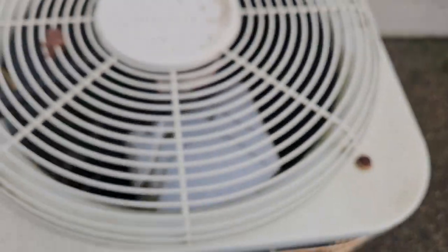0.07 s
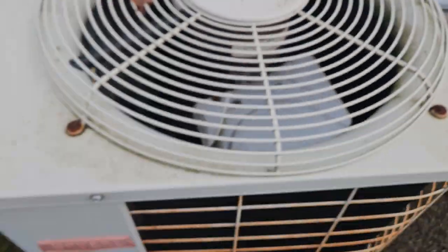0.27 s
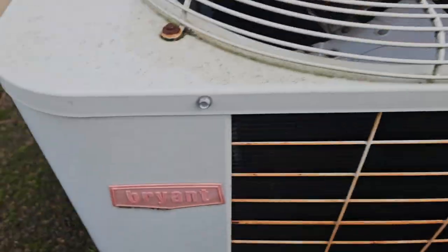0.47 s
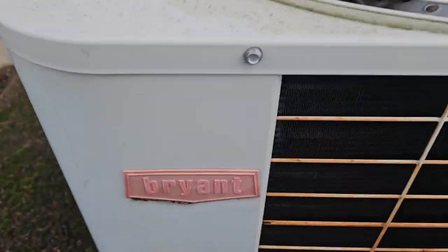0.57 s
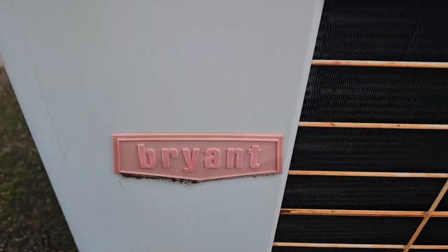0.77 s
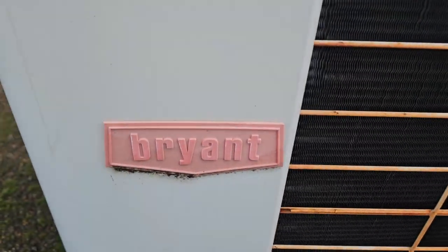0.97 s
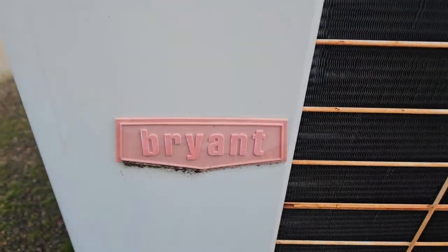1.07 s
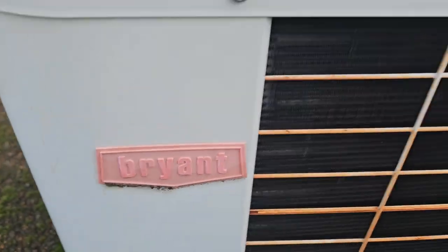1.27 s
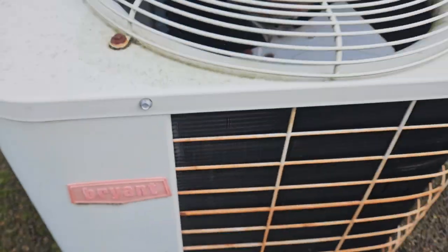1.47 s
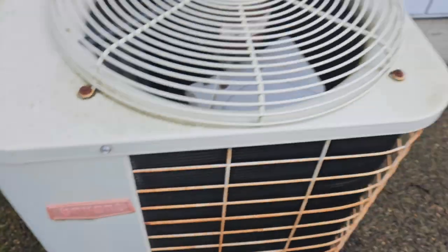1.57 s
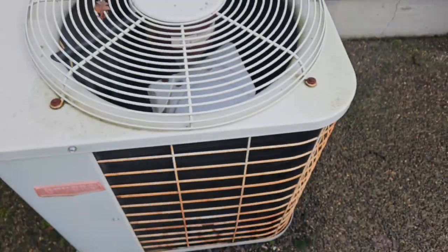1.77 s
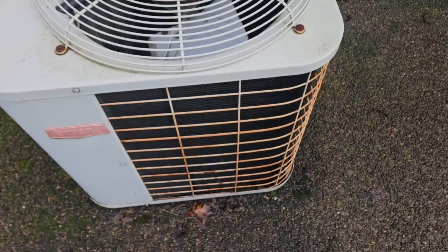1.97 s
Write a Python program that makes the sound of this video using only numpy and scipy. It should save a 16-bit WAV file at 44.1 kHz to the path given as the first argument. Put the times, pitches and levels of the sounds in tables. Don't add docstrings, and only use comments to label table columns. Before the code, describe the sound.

Gritty footsteps scuff and drag on stony ground beside a low rumbling outdoor air-conditioning unit

```python
import sys
import numpy as np
from scipy import signal
from scipy.fft import rfft, irfft, next_fast_len
from scipy.io import wavfile
from scipy.ndimage import uniform_filter1d

SR = 44100
rng = np.random.default_rng(int(sys.argv[2]) if len(sys.argv) > 2 else 0)


def output_pcm(signal):
    pcm = np.clip(np.atleast_2d(signal).T, -1, 1) * 32767
    wavfile.write(sys.argv[1], SR, np.round(pcm).astype(np.int16))


def amplitude_ratio(level_db):
    exponent = np.asarray(level_db, float) / 20
    return 10 ** exponent


N = 88464


def curve(table, col=1):
    return np.interp(np.arange(N) / SR, np.array(table)[:, 0], np.array(table)[:, col])


def on_log(table, hz):
    return np.interp(np.log(hz + 1), np.log(np.array(table)[:, 0]), np.array(table)[:, 1])


def unit(x):
    return x / np.sqrt(np.mean(x ** 2))


def colour(x, table):
    size = next_fast_len(N + SR // 4)
    gain = amplitude_ratio(on_log(table, np.fft.rfftfreq(size, 1 / SR)))
    return irfft(rfft(x, size) * gain, size)[..., :N]


def band(x, hz, width_hz):
    return signal.lfilter(*signal.iirpeak(hz, hz / width_hz, SR), x)


def walk(rate):
    k = int(SR / rate)
    steps = np.repeat(rng.standard_normal(N // k + 1), k)
    return 1.68 * uniform_filter1d(uniform_filter1d(steps, k), k)[:N]


def pan(db):
    return amplitude_ratio(np.array([db / 2, -db / 2]) - np.abs(db) / 4).reshape(2, -1)


def add(out, start_s, x, pan_db):
    right_lag_s = pan_db * 30e-6
    for port, gain, lag_s in zip(out, pan(pan_db), (0, right_lag_s)):
        i = max(int((start_s + lag_s) * SR), 0)
        port[i:i + len(x)] += gain * x[:N - i]


def crackle(apart=1):
    grains_per_s, spread_db, grain_share_db, left_lag_s = 1500, 2.5, -7, .0003
    hits = rng.random(N) < grains_per_s / SR
    grains = hits * amplitude_ratio(spread_db * np.minimum(rng.exponential(size=N), 4))
    size = 1 + amplitude_ratio(grain_share_db) * unit(grains)
    shared, left, right = size * rng.standard_normal((3, N))
    late = np.roll(shared, int(left_lag_s * SR))
    return unit(np.array([late + apart * left, shared + apart * right]))


def rub(bands, level_db, pan_db, patchy_db, rate, apart=1):
    push = crackle(apart) * amplitude_ratio(patchy_db * walk(rate))
    ringing = sum(amplitude_ratio(db) * band(band(push, hz, w), hz, w) for hz, w, db in bands)
    return unit(ringing) * amplitude_ratio(curve(level_db)) * pan(pan_db)


def snap(db, t60_s, hz, width_hz):
    attack_s = 0.00077
    t = np.arange(SR // 20) / SR
    burst = rng.standard_normal(len(t)) * np.minimum(t / attack_s, 1) * amplitude_ratio(db - 60 * t / t60_s)
    return band(band(burst, hz, width_hz), hz, width_hz)


def unit_air():
    # frequency in Hz, level in dB per Hz.
    rumble_colour = [(12, -64.5), (20, 2), (114, 0.5), (205, -10.5), (245, -5), (300, -13), (324, -11.5),
                     (5980, -54), (9000, -70), (11700, -102), (19800, -120)]
    # time in seconds, level in dB.
    rumble_db = [(0.0, -47), (1.32, -48.5), (2.0, -47.5)]
    # frequency in Hz, likeness from 0 to 1.
    likeness = [(30, 0.92), (300, 0.89), (1000, 0.34), (4000, 0)]
    # time in seconds, level in dB.
    hum_db = [(0, -75), (.8, -80.5), (1.1, -71.5), (1.22, -57), (1.6, -55), (1.75, -65.5), (2, -73)]
    hum_hz, hum_width_hz = 245, 34

    out = 0
    for hz in 22 * 2 ** np.arange(0, 9.1, .5):
        mid, side = (band(rng.standard_normal(N), hz, hz / 1.42) for _ in range(2))
        like = np.clip(on_log(likeness, hz), 0, 1)
        both = np.sqrt(1 + like) * mid + np.sqrt(1 - like) * side * np.array([[1], [-1]])
        out = out + amplitude_ratio(3.07 * walk(6.7)) * both
    rumble = unit(colour(out, rumble_colour)) * amplitude_ratio(curve(rumble_db))
    hum = unit(band(band(rng.standard_normal(N), hum_hz, hum_width_hz), hum_hz, hum_width_hz))
    return rumble + hum * amplitude_ratio(curve(hum_db)) * pan(-3.5)


def rustle():
    # time in seconds, level in dB, left minus right in dB.
    effort = [(0, -63.5, -6), (.1, -79.5, -22), (.23, -73.5, -2), (.3, -62, 7), (.42, -69.5, 1),
              (.55, -73.5, -5), (.68, -69, -8.5), (.8, -68, -11.5), (.92, -80, -8), (.97, -90.5, -8.5),
              (1.29, -87.5, -9.5), (1.37, -76.5, -3), (1.5, -79.5, -11), (1.62, -82, -11),
              (1.7, -78.5, -14), (1.82, -78.5, -7.5), (2, -81.5, -14.5)]
    # frequency in Hz, level in dB per Hz.
    rustle_colour = [(300, -12), (1000, 17.5), (2500, 1), (3900, -5), (5500, 5.5), (7000, -1), (8800, -0.5),
                     (16000, -5.5)]
    flutter_db = 1.93 * walk(23.53)
    level = amplitude_ratio(curve(effort) + flutter_db + 5.0)
    return unit(colour(crackle(), rustle_colour)) * level * pan(curve(effort, col=2))


def scuffs():
    # frequency in Hz, level in dB per Hz.
    grit_colour = [(300, -12), (1500, 4.5), (3000, 4), (4000, 0.5), (5300, 4.5), (6600, -2), (8500, 3),
                   (16000, -1)]
    # start in seconds, length in seconds, level in dB, left minus right in dB,
    # brightness in dB per octave.
    scuff_rows = [(0, 0.049, -65, -14, 3), (0.242, 0.036, -57.5, 5, 7.5), (0.278, 0.035, -45.5, 2, 2.5),
                  (0.314, 0.05, -52.5, -3, -1.5), (0.38, 0.035, -63.5, -4, -3), (0.417, 0.11, -62, -12, -3),
                  (0.562, 0.024, -78, -8, -2), (0.696, 0.043, -54.5, 0.5, -3.5),
                  (0.748, 0.022, -57.5, -8, 0.5), (.785, 0.033, -71, -3, 2), (0.829, 0.088, -68, -12, -7),
                  (1.136, 0.05, -79, -17, -11.5), (1.305, 0.013, -65, -22, -4),
                  (1.316, 0.035, -57, -15, -2.5), (1.39, .03, -77.5, -12, 4),
                  (1.439, 0.053, -72.5, -20, -2.5), (1.524, 0.05, -66.5, -22, -2),
                  (1.72, 0.075, -71.5, -19.5, -5.5), (1.845, 0.061, -74, -22, -5.5)]
    attack_s, release_s, sag_db, banding_db = .003, .005, -2, 2.5
    swell_share, fade_share = .12, .25

    out, t = 0, np.arange(N) / SR
    grit = unit(colour(crackle(), grit_colour)) * amplitude_ratio(1.7 * walk(120) + 1.4 * walk(40.04))
    hz = np.geomspace(500, 16000, num=24)
    for start, length, db, pan_db, tilt_db in scuff_rows:
        age = np.clip(t - start, 0, None)
        rise = np.clip(age / (attack_s + swell_share * length), 0, 1)
        fade = np.exp(-np.clip(age - length, 0, None) / (release_s + fade_share * length))
        shape = rise * amplitude_ratio(sag_db * age / length) * fade
        banded = tilt_db * np.log2(hz / 4000) + banding_db * rng.standard_normal(len(hz))
        out = out + colour(grit, np.array([hz, banded]).T) * shape * amplitude_ratio(db) * pan(pan_db)
    return out


def drag():
    # frequency in Hz, width in Hz, level in dB.
    drag_bands = [(3190, 420, 4.5), (4600, 470, -5), (2290, 480, 0), (1520, 600, -2)]
    # time in seconds, level in dB.
    drag_db = [(0, -62.5), (.05, -61), (.16, -58), (.275, -57), (.3, -72.5), (.4, -140)]
    return rub(drag_bands, drag_db, pan_db=-10, patchy_db=0.91, rate=60.8)


def cloth():
    # frequency in Hz, width in Hz, level in dB.
    cloth_bands = [(290, 170, 2), (430, 200, 0), (570, 150, -6)]
    # time in seconds, level in dB.
    cloth_db = [(0, -59), (.15, -56.5), (.4, -61), (0.801, -70.5), (1.32, -72.5), (1.42, -55.5),
                (1.56, -51.5), (1.7, -59.5), (1.82, -60)]
    return rub(cloth_bands, cloth_db, pan_db=-2.0, patchy_db=2.5, rate=30.75, apart=0.46)


def thuds():
    # start in seconds, peak in dB, pitch in Hz, left minus right in dB,
    # first swing (+1 up or -1 down).
    thud_rows = [(0.091, -42, 58.3, -5, 1), (.125, -42, 72, 1, 1), (0.201, -42, 84, 18, 1),
                 (0.344, -35, 56.7, 8, 1), (0.384, -37, 45, -6, 1), (0.456, -32, 75.5, -13, -1),
                 (.522, -39, 60.4, 0, 1), (0.559, -29.5, 101.4, -16.5, -1), (1.094, -43.5, 83.3, 1, 1),
                 (1.32, -32.5, 111, -9, 1), (1.445, -32, 77, -12, 1), (1.549, -33, 64.6, 3, 1),
                 (1.581, -38.5, 70, 6, -1), (1.654, -34.5, 69.4, 1, -1), (1.9, -36.5, 71, 3, 1)]
    fade_cycles = 1.32
    out, t = np.zeros((2, N)), np.arange(SR // 5) / SR
    for start, db, hz, pan_db, way in thud_rows:
        swing = np.sign(way) * np.sin(2 * np.pi * hz * t)
        swing = swing * t * hz * amplitude_ratio(-40 * t * hz / fade_cycles)
        add(out, start, swing / np.abs(swing).max() * amplitude_ratio(db), pan_db)
    return out


def ticks():
    # start in seconds, peak in dB, left minus right in dB, centre in Hz.
    tick_rows = [(.102, -46.5, -9.5, 6860), (0.245, -41, 2.5, 9000), (.365, -52, 0, 6500),
                 (.3768, -37.5, 0.5, 2880), (0.4366, -48, -11, 9000), (0.456, -46, -7, 12000),
                 (0.5616, -49.5, -12, 6000), (0.5618, -48, -9.5, 13000), (.59, -60, -8, 11000),
                 (.6778, -52, 1.5, 4500), (0.698, -50, 1, 4000), (.737, -43, 0, 5000),
                 (0.7443, -34.5, -1, 6000), (0.7449, -41, -0.5, 13000), (.761, -48, -2, 5500),
                 (0.767, -49, 1, 5500), (0.8, -46, -3.5, 7060), (.841, -53, -7, 4400),
                 (.962, -65, -6, 5300), (1.1588, -57, -5.5, 4500), (1.3205, -51, -15, 8540),
                 (1.417, -58, -12, 2000), (1.4486, -52, -12, 2900), (1.456, -59.5, -6, 6000),
                 (1.728, -56, -7, 13000), (1.759, -45.5, -5.5, 7100), (1.786, -57, -7.5, 5000),
                 (1.8532, -61, -8, 4300), (1.985, -67.5, -3, 5520)]
    out = np.zeros((2, N))
    for start, db, pan_db, hz in tick_rows:
        add(out, start, snap(db, t60_s=.013, hz=hz, width_hz=1.34 * hz), pan_db)
    return out


def squeal():
    # frequency in Hz, width in Hz, level in dB.
    squeal_bands = [(8460, 600, -4.5), (9000, 330, -1.5), (7845, 250, -6.5), (13000, 280, -7)]
    # time in seconds, level in dB.
    squeal_db = [(.26, -140), (.276, -81.5), (0.284, -44), (0.294, -29), (0.297, -62), (.31, -46.5),
                 (.32, -58.5), (.335, -92), (.35, -140)]
    return rub(squeal_bands, squeal_db, pan_db=8, patchy_db=0.94, rate=200)


def chips():
    # start in seconds, peak in dB, pitch in Hz, left minus right in dB.
    chip_rows = [(0.2936, -42, 1970, 1), (0.307, -35, 2390, -3.5), (0.3182, -37, 2200, -3.5),
                 (0.336, -45, 1370, 0), (0.3771, -40, 2520, 2.5), (.413, -45, 1110, 1),
                 (.429, -50, 1200, 0), (0.6779, -35.5, 2480, 2), (0.7157, -38.5, 2120, -5),
                 (0.7175, -48, 1900, -8), (0.7317, -43, 2500, -1.5), (1.3226, -46, 3070, -12.5),
                 (1.7582, -46.5, 2200, -3.5), (1.7805, -45, 2780, -3)]
    fade_cycles = 15.3
    out, t = np.zeros((2, N)), np.arange(SR // 20) / SR
    for start, db, hz, pan_db in chip_rows:
        ring = np.sin(2 * np.pi * hz * t) * np.minimum(t * hz, 1)
        add(out, start, ring * amplitude_ratio(db - 60 * t * hz / fade_cycles), pan_db)
    return out


def knocks():
    # multiple of the pitch, level in dB, cycles to fall by 60 dB.
    stone_tones = [(.5, 3, 2.86), (.57, -8.5, 13), (.71, -5.5, 16), (1.04, 1, 7), (1.24, -1.5, 15.3),
                   (1.66, -4, 13.6), (2.4, -2.5, 17.3), (3.3, -9, 36), (5.6, -10, 30), (6.5, -21, 74)]
    # start in seconds, peak in dB, pitch in Hz, left minus right in dB.
    knock_rows = [(0.4930, -20.5, 848, -1), (0.4956, -29, 870, -3.5), (0.5012, -33.5, 760, -14),
                  (0.504, -34.5, 816, 5.5), (0.715, -33, 923, -1), (0.717, -38, 1050, 3.5),
                  (.7300, -36, 803, 2.5), (.7225, -41.5, 800, -3), (0.737, -43.5, 690, -4),
                  (1.319, -36.5, 457, -11), (1.504, -45, 706, -8), (1.758, -47, 740, 0.5),
                  (1.9016, -46, 696, -6)]
    attack_cycles, crack_hz = 0.26, 3500
    out, t = np.zeros((2, N)), np.arange(SR // 20) / SR
    for start, db, hz, pan_db in knock_rows:
        ring = 0
        for k, tone_db, cycles in stone_tones:
            fade = amplitude_ratio(tone_db - 60 * t * hz / cycles * k)
            ring = ring + np.sign(.8 - k) * fade * np.sin(2 * np.pi * k * hz * t)
        ring = ring * (1 - np.exp(-t * hz / attack_cycles))
        crack = snap(-18, t60_s=0.009, hz=crack_hz, width_hz=1.4 * crack_hz)
        add(out, start, (ring / np.abs(ring).max() + crack) * amplitude_ratio(db), pan_db)
    return out


def sand():
    # frequency in Hz, width in Hz, level in dB.
    sand_bands = [(4720, 900, 0.5), (5830, 810, -0.5)]
    # time in seconds, level in dB.
    sand_db = [(.7, -96), (.78, -69), (.92, -79), (.96, -97.5), (1.12, -92), (1.15, -78.5), (1.19, -92),
               (1.3, -93), (1.33, -69), (1.38, -95), (1.47, -79), (1.51, -86), (1.551, -75), (1.6, -91),
               (1.84, -93), (1.87, -75), (1.93, -90)]
    return rub(sand_bands, sand_db, pan_db=-10, patchy_db=3.3, rate=50)


def scene():
    feet = rustle() + scuffs() + drag() + squeal() + sand()
    stones = ticks() + chips() + knocks()
    return unit_air() + feet + stones + cloth() + thuds()


def roll_off(x):
    return signal.sosfilt(signal.butter(12, 16500, fs=SR, output="sos"), x)


def record(dry):
    # frequency in Hz, gain in dB.
    treble_colour = [(8900, 1), (9400, -8), (10300, -11), (11300, -4), (12500, -1), (15800, -1), (15950, -36)]
    return roll_off(colour(dry, treble_colour))


dry = scene()
out = record(dry)
output_pcm(out)
```